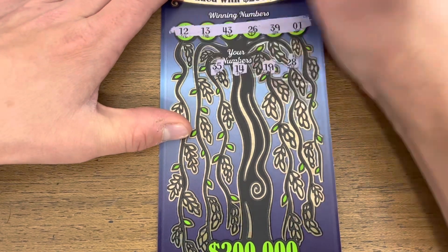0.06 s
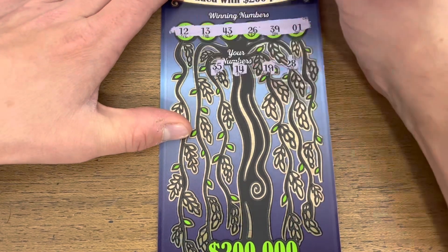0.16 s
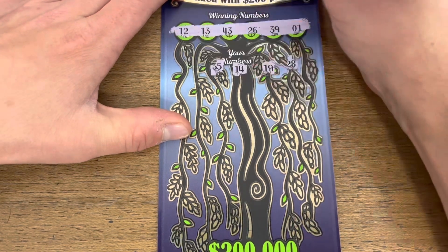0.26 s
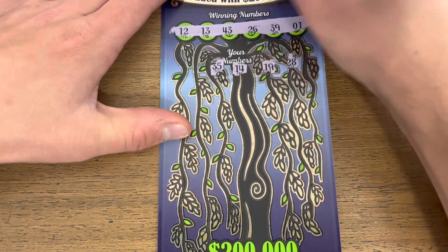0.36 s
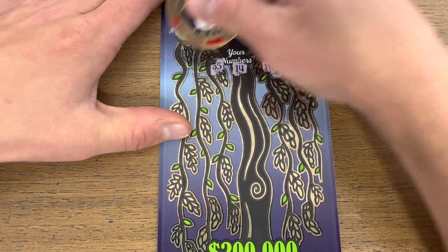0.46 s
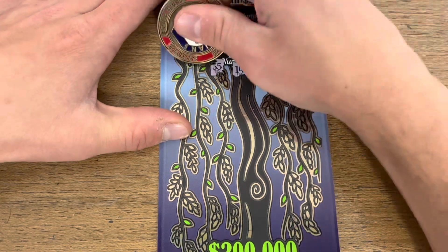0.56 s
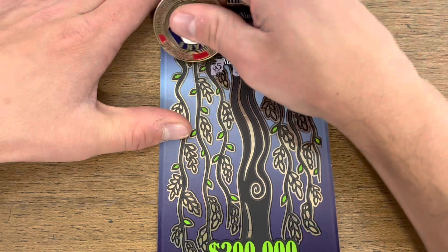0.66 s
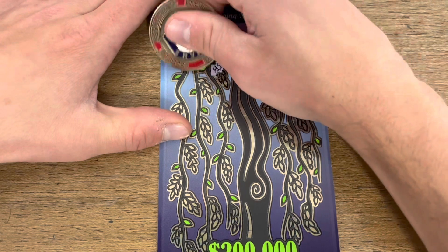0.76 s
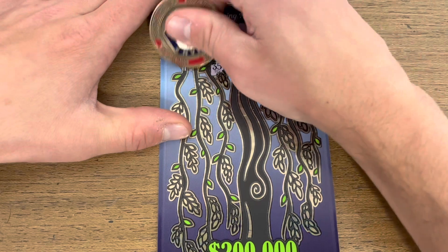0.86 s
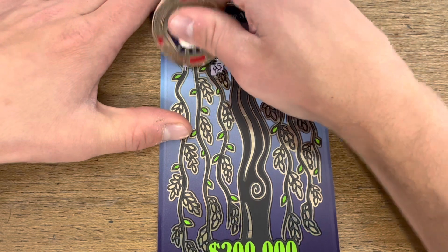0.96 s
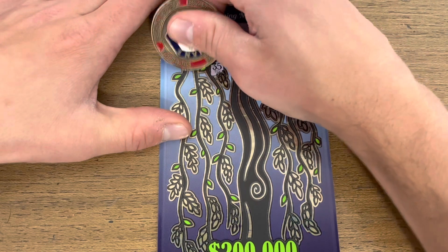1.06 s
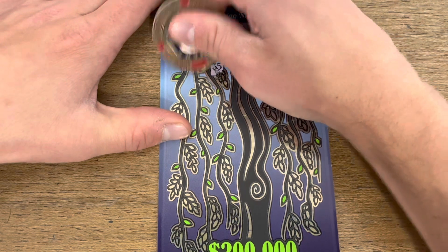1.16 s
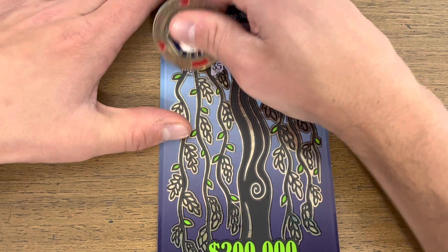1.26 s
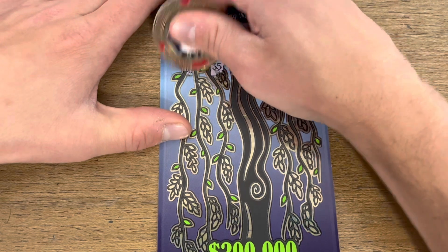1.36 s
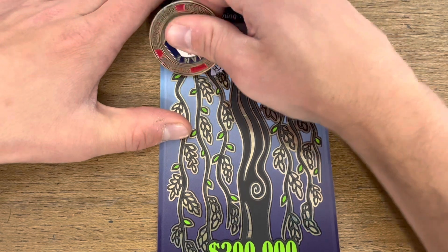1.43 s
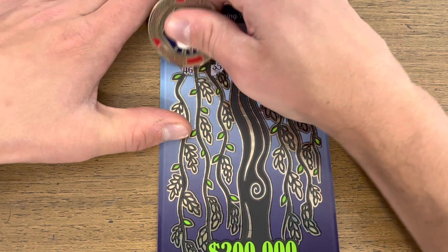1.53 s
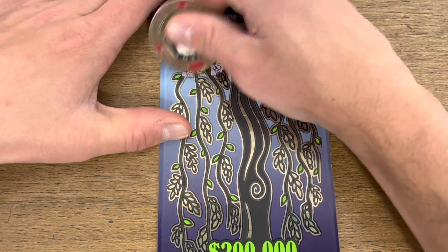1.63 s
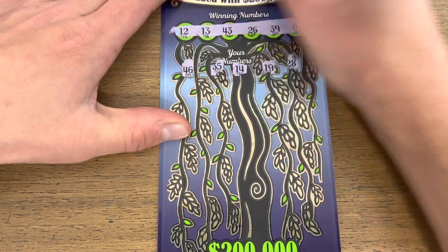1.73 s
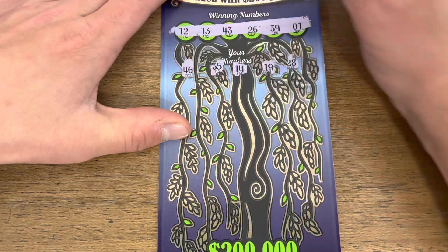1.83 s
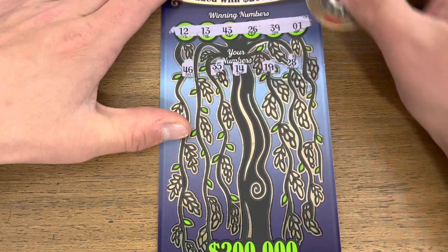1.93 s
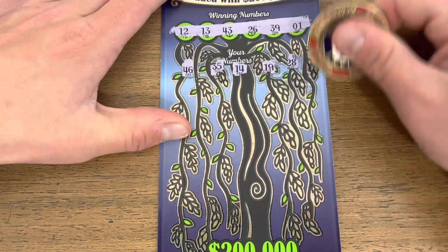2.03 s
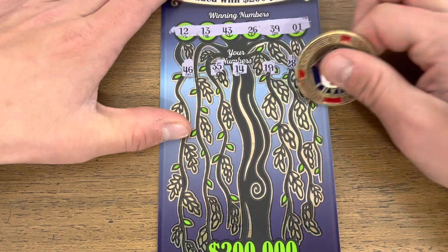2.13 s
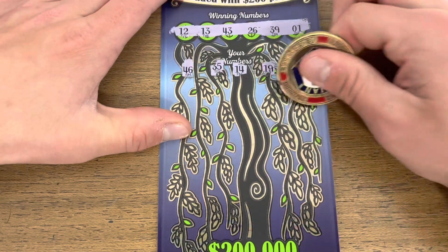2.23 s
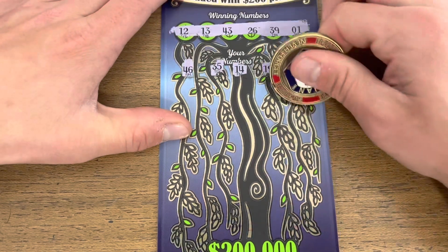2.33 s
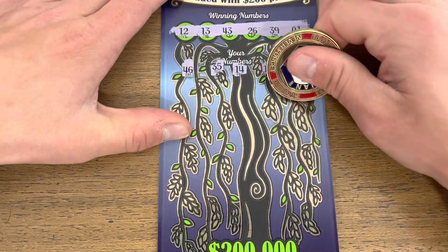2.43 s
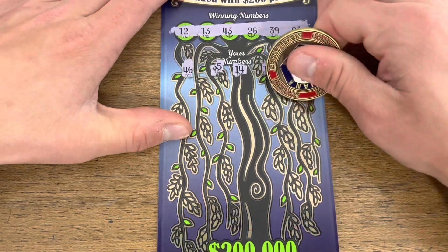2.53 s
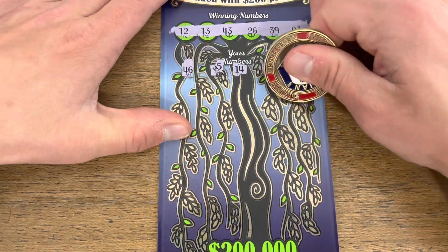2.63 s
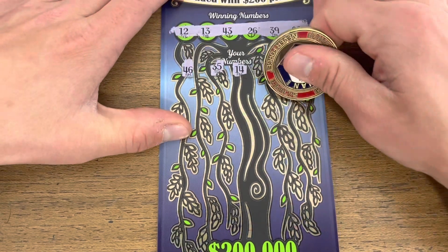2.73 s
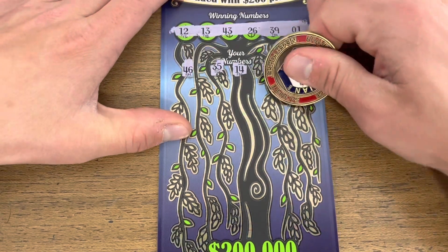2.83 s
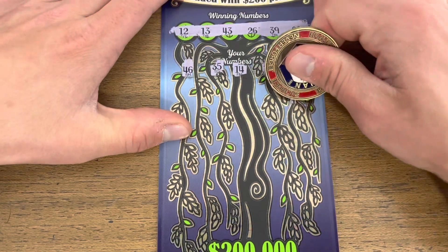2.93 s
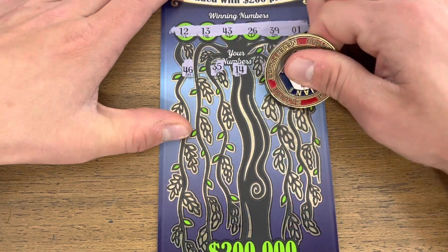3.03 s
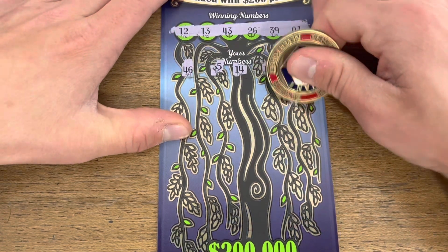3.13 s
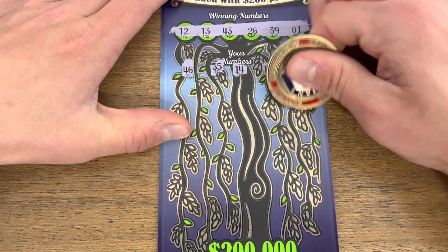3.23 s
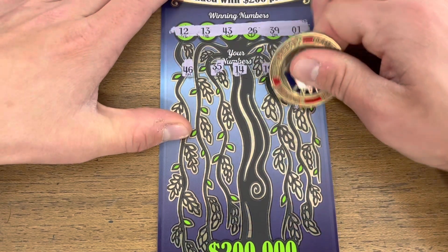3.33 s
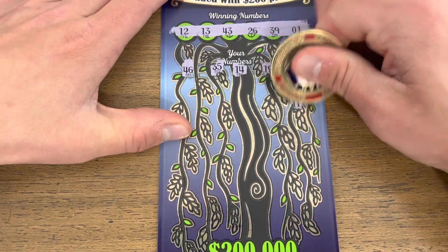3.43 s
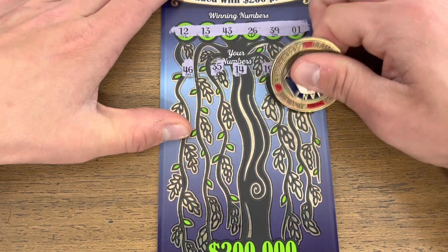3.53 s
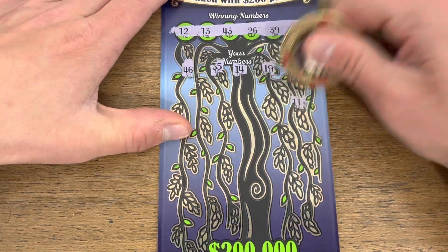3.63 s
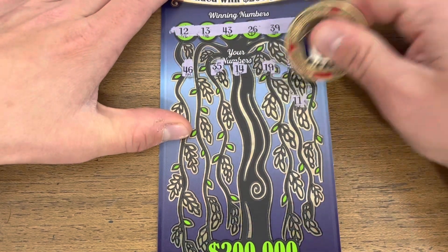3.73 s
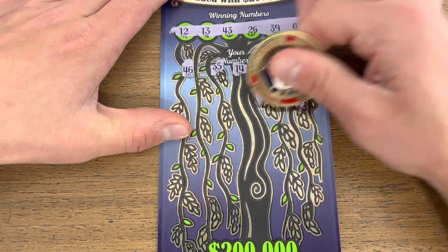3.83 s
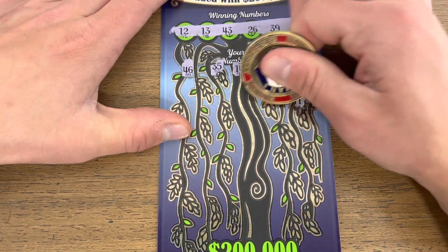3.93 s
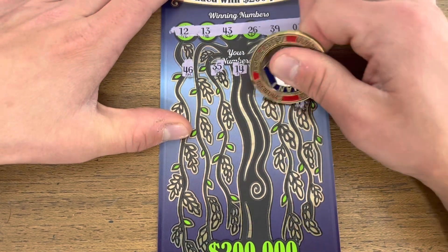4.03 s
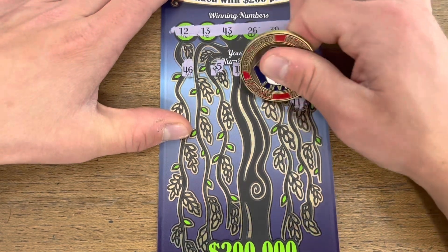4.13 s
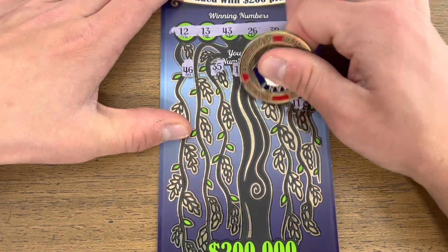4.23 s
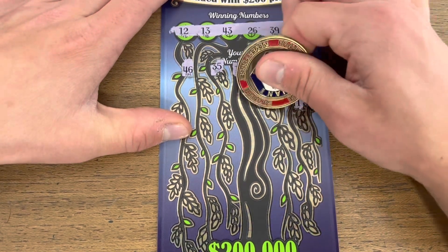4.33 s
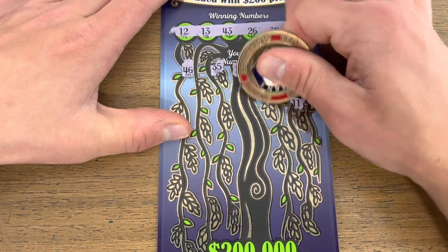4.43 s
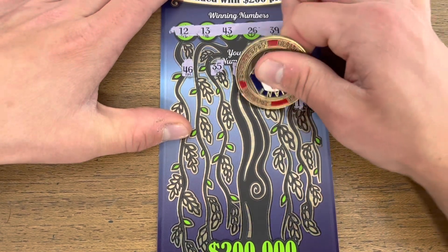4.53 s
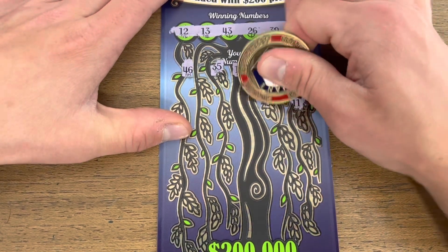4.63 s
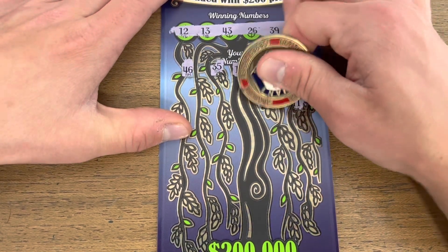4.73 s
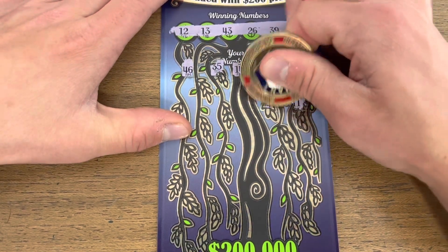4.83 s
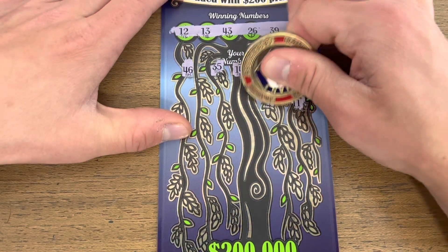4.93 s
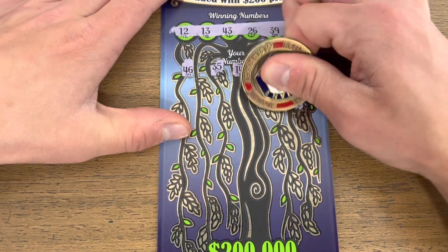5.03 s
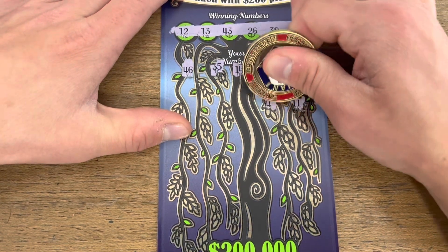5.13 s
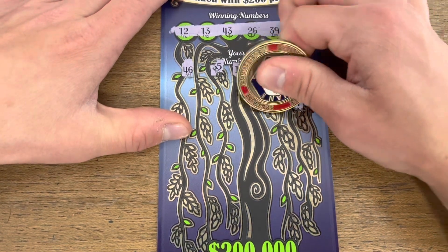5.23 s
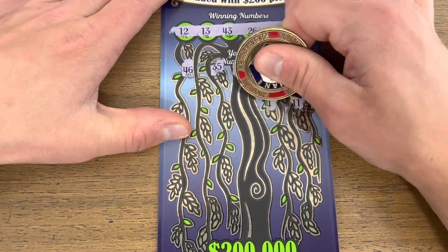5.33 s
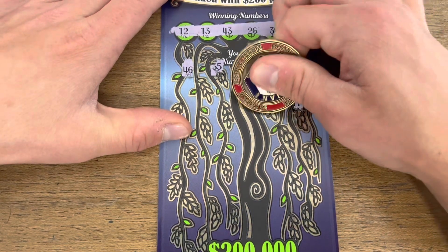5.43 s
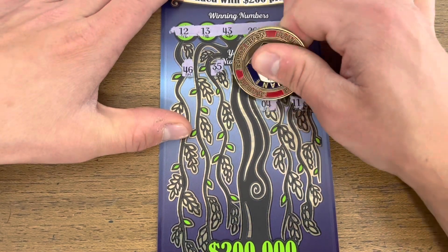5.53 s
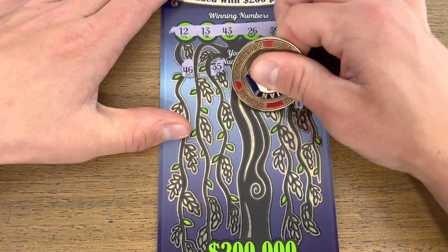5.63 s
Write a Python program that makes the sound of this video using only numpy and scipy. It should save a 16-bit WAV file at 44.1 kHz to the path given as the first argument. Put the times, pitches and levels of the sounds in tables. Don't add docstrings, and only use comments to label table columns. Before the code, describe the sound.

A coin scrapes coating off a card ticket in three bouts of quick gritty back-and-forth strokes, with knocks and finger ticks between, in a quiet room.

```python
import sys
import numpy as np
from scipy import signal
from scipy.fft import rfft, irfft
from scipy.io import wavfile
from scipy.ndimage import uniform_filter1d

SR = 44100
rng = np.random.default_rng(int(sys.argv[2]) if len(sys.argv) > 2 else 0)


def how_loud(loudness_db):
    steps = np.asarray(loudness_db, float) / 20
    return 10 ** steps


def dump(signal):
    limited = np.clip(np.atleast_2d(signal).T, -1, 1)
    pcm = np.round(limited * 32767).astype(np.int16)
    wavfile.write(sys.argv[1], SR, pcm)


N = 250047


def unit(x):
    return x / np.sqrt(np.mean(np.atleast_2d(x)[0] ** 2))


def convolve(x, h):
    return signal.oaconvolve(x, h)[:N]


def add(sound, part, start_s):
    i = int(start_s * SR)
    sound[..., i:i + part.shape[-1]] += part[..., :N - i]


def walk(rate_hz):
    hold = int(SR / rate_hz)
    steps = np.repeat(rng.standard_normal(N // 20), hold)[:N]
    return 0.99 * uniform_filter1d(steps, hold)


def flakes(rate_hz, scatter_db):
    when, size, sign = rng.random((3, N))
    height = how_loud(-scatter_db * np.log(size + 0.0012))
    return unit((when < rate_hz / SR) * height * (sign - 0.5))


def response(points):
    hz, db = np.transpose(points)
    bins_hz = np.arange(1, 4098) * SR / 8192
    cepstrum = irfft(np.log(how_loud(np.interp(np.log(bins_hz), np.log(hz), db))))
    cepstrum[1:4096] *= 2
    cepstrum[4097:] = 0
    h = irfft(np.exp(rfft(cepstrum)))
    return h / np.sqrt(np.sum(h ** 2))


def coloured(force, colour, side_db, alike):
    smear = rng.standard_normal(400) * np.exp(-np.arange(400) / 100.0)
    other = convolve(force, smear / np.sqrt(np.sum(smear ** 2)))
    alike = np.clip(alike, 0, 1)
    side = alike * force + np.sqrt(1 - alike ** 2) * other
    return np.array([convolve(force, response(colour[0])), how_loud(side_db) * convolve(side, response(colour[1]))])


def ring(modes, detune=0, shift_db=0):
    hz, t60, mid_db, side_db = np.transpose(modes)[:, :, None]
    hz = hz * (1 + detune)
    t = np.maximum(np.arange(int(t60.max() * SR)) / SR - 0.01611 / np.sqrt(hz), 0)
    decay = np.exp(-np.log(1000) * t / t60) / np.sqrt(t60)
    onset = 1 - np.exp(-t * hz * 7.6)
    waves = decay * onset * np.sin(2 * np.pi * hz * t)
    k = np.arange(len(modes))[:, None]
    mid = (-1) ** k * how_loud(mid_db)
    side = (-1) ** (k + (k % 3 == 2)) * how_loud(side_db)
    pair = (how_loud(shift_db) * np.array([mid, side]) * waves).sum(1)
    return pair / np.sqrt(np.sum(pair[0] ** 2))


def strike(force, modes, detune=0, shift_db=0):
    return signal.oaconvolve(force[None], ring(modes, detune, shift_db), axes=1)


def favour(modes, centre_hz, slope_db):
    return -slope_db * np.abs(np.log2(np.array(modes)[:, :1] / centre_hz))


def bite(length, rise_s, fall_s, drag_db):
    t = np.arange(int((length + 0.12) * SR)) / SR - 0.02
    late = np.maximum(t - length + fall_s, 0)
    press = np.exp(-np.maximum(rise_s - t, 0) ** 2 / rise_s ** 2)
    release = np.exp(-late / fall_s) + how_loud(drag_db) * np.exp(-late / 0.033)
    return press * release


# pitch_hz [Hz], level_db [dB]
AIR = [
    [(15, -16), (25, 12), (93, -2.5), (186, -15), (427, -27), (515, -32), (1090, -40), (1180, -37), (2930, -45.5), (3350, -32.5), (3830, -46), (7090, -41.5), (8550, -51), (9900, -49), (13500, -41), (14400, -56)],
    [(15, -46), (25, 28.5), (237, -6.5), (415, -5), (543, -9), (1630, -14), (2130, -19), (7890, -14.5), (15000, -43.5)],
]


def air():
    noise = rng.standard_normal(N) * how_loud(1.4 * walk(rate_hz=4.3))
    return how_loud(-54) * coloured(noise, AIR, side_db=-12, alike=0.23)


# start_s [s], length_s [s], hiss_db [dB], wood_rumble_db [dB]
SLIDES = [(-.03, 0.14, -70, -58), (0.373, .17, -76, -63.5), (0.596, 0.38, -77.5, -62),
          (0.995, 0.56, -75.5, -56), (1.615, 0.4, -61.5, -62), (2.296, .2, -100, -88),
          (2.58, 0.35, -83, -54), (2.94, 0.55, -72.5, -53.5), (3.525, 0.076, -65.5, -52),
          (3.734, 0.088, -69, -62.5), (4.254, 0.63, -78.5, -55), (4.977, 1, -73, -52.5)]


def glide(column):
    rise_s, fall_s = 0.027, 0.038
    t = np.arange(N) / SR
    gain = np.zeros(N)
    for row in SLIDES:
        start_s, length_s = row[:2]
        ease_in = np.clip((t - start_s) / rise_s, 0, 1) ** 2
        let_go = np.exp(-np.maximum(t - start_s - length_s, 0) / fall_s)
        gain += how_loud(row[column]) * ease_in * let_go
    return gain


# pitch_hz [Hz], level_db [dB]
SKIN = [
    [(470, -35), (800, -5), (1360, -3), (1460, -6), (3160, -2), (6510, -3), (8740, -32), (9890, -8), (11700, -7), (13800, -13), (15000, -49)],
    [(470, -33), (800, -3), (2300, -12), (7930, -10), (10500, -15), (12500, -58), (12900, -23), (15000, -20)],
]
# pitch_hz [Hz], t60_s [s], mid_db [dB], side_db [dB]
BASS = [(62.8, 0.61, 1, -24), (94, 0.13, -20, -42), (127.3, 0.12, 12, -24), (170, 0.11, 4, -13)]
# pitch_hz [Hz], t60_s [s], mid_db [dB], side_db [dB]
TABLE = [(213, 0.14, -8, -14), (260.2, 0.14, -6, -13), (322, 0.066, -4, -5), (376.7, 0.069, -1.5, -7),
         (405.6, 0.058, 1.5, -8.5), (468.6, 0.08, -9.5, -12), (501, 0.097, -2.5, -12),
         (615.6, 0.05, -9.5, -41), (639, 0.068, -4, -7.5)]
# pitch_hz [Hz], t60_s [s], mid_db [dB], side_db [dB]
CARD = [(744.4, 0.09, 0, -1), (809.6, 0.02, 2.5, -10), (847.3, 0.024, 5, -9.5), (942.4, 0.032, 0, -19),
        (993, 0.043, -1.5, -8), (1107, 0.018, -2, -9.5), (1106, 0.035, -4.5, -6.5), (1333, 0.027, -3, -12),
        (1462, 0.035, -3.5, 1.5), (1504, 0.0087, 1.5, -18), (1796, 0.017, -3, -4), (1836, 0.045, 0, -65)]


def sliding():
    hiss = glide(column=2) * how_loud(walk(rate_hz=30)) * flakes(rate_hz=30000, scatter_db=2.5)
    rumble = glide(column=3) * how_loud(2.9 * walk(rate_hz=57)) * flakes(rate_hz=3000, scatter_db=1.5)
    sound = how_loud(1.5) * coloured(hiss, SKIN, side_db=0, alike=0.2)
    for modes, db in ((TABLE, -6), (CARD, -12), (BASS, -6)):
        sound += how_loud(db) * strike(rumble, modes)[:, :N]
    return sound


# start_s [s], length_s [s], level_db [dB], grip_pitch_hz [Hz]
RUBS = [(0.078, 0.015, -48.5, 3200), (0.1, 0.032, -50.5, 3370), (0.14, 0.021, -47.5, 3280),
        (0.155, 0.083, -59.5, 3300), (0.263, 0.0048, -59.5, 3580), (0.27, 0.034, -84, 3270),
        (0.45, 0.06, -50.5, 3130), (0.479, 0.016, -43.5, 3220), (0.503, 0.026, -58.5, 3300),
        (2.061, 0.055, -66, 3200), (2.156, 0.026, -68.5, 3320), (2.176, 0.083, -74.5, 3720),
        (3.969, 0.022, -66.5, 2980), (4.01, 0.043, -74, 3200), (4.05, 0.047, -69.5, 3350),
        (4.091, 0.041, -72, 3160)]
# pitch_hz [Hz], t60_s [s], mid_db [dB], side_db [dB]
FINGERS = [(3200, 0.012, 6.5, -6.5), (3600, 0.0052, 3, -7), (4090, 0.006, 1.5, -10),
           (4830, 0.0013, -5, -16), (5520, 0.0022, -4, -28), (1590, 0.018, -16, -30),
           (7100, 0.0013, -6, -3), (10600, 0.0015, -13.5, -38), (12500, .003, -20, -20)]


def rubbing():
    sound = np.zeros((2, N))
    skin = how_loud(2.5 * walk(rate_hz=240)) * flakes(rate_hz=14000, scatter_db=0.5)
    for start_s, length, db, hz in RUBS:
        shape = bite(length, rise_s=min(0.002, length / 4), fall_s=min(0.004, length / 3), drag_db=-61)
        i = int((start_s - 0.02) * SR)
        force = shape * skin[i:i + len(shape)]
        add(sound, how_loud(db) * strike(force, FINGERS, detune=hz / FINGERS[0][0] - 1), i / SR)
    return sound


# start_s [s], peak_db [dB], pitch_hz [Hz], top_db [dB], ring_cycles [cycles]
TICKS = [(0.1036, -13, 3310, -28, 3.5), (0.1447, -32, 3450, -22, 2.5), (0.177, -26.5, 3500, -25, 3.7),
         (0.2557, -27, 3460, -29.5, 4.9), (0.3426, -52, 3260, -26, 3.2), (0.61, -30, 5170, -44, 5),
         (0.695, -46, 3100, -22, 4.7), (1.6064, -41, 4350, -20, 3.2), (1.6343, -29.5, 4270, -14, 4.4),
         (2.614, -43, 4330, -22, 2.3), (3.5614, -54, 4330, -18, 2.1), (3.589, -48, 4360, -8, 2.3),
         (3.6058, -17, 5580, -20.5, 1.8), (3.972, -34, 3200, -47, 2.5), (4.0994, -64, 3380, -9, 2.5)]


def ticking():
    sound = np.zeros((2, N))
    t = np.arange(500) / SR
    quick = np.exp(-t / 0.00038)
    for (start_s, db, hz, top_db, cycles), noise in zip(TICKS, rng.standard_normal((len(TICKS), 500))):
        body = np.sin(2 * np.pi * hz * t) * np.exp(-t * hz / cycles)
        body += 1.06 * np.sin(2 * np.pi * 1.47 * hz * t) * quick
        top = 0.92 * how_loud(top_db) * np.diff(noise, prepend=0) * np.exp(-t / 0.0018)
        tick = body * (1 - quick) + top
        add(sound, how_loud(db - 3.5) * tick * np.array([[1], [0.4]]), start_s)
    return sound


# pitch_hz [Hz], level_db [dB]
GRIT = [
    [(940, -33), (1600, 4.5), (2030, -4.5), (3270, -14.5), (3950, -1), (5250, -12.5), (5950, -4), (7610, -11), (9390, -10), (13600, -20), (15500, -75)],
    [(940, -10), (1600, -21), (2030, -12), (3990, -5), (5250, -20.5), (6060, -4), (8060, -16), (9660, -7), (11900, -54), (13000, 0), (15500, -73)],
]


def gritty(force, alike):
    return coloured(force, GRIT, side_db=-2.5, alike=alike)


# start_s [s], peak_db [dB], card_share_db [dB], crack_db [dB]
KNOCKS = [
    (0.384, -63, 24, -8),
    (0.405, -60.5, 18, -16),
    (0.55, -33, 14, -32),
    (0.602, -35.5, 16, -10),
    (2.261, -29.5, 9.5, -24),
    (2.408, -54, 14, -18),
    (2.525, -61, 19, -7),
    (2.863, -40.5, -2, -16),
    (4.127, -30.5, 14.5, -25.5),
    (5.023, -44, -17, -4),
]
# pitch_hz [Hz], t60_s [s], mid_db [dB], side_db [dB]
THUD = [(354, 0.052, 3.5, 1.5), (530, 0.0082, 5, -8.5), (947, 0.024, -1.5, -24)]


def knocks():
    sound, crack = np.zeros((2, N)), np.zeros(N)
    samples = np.arange(120)
    push = samples * np.exp(-samples / 5.17) / 3
    for (start_s, db, card_db, crack_db), tilt in zip(KNOCKS, rng.standard_normal((len(KNOCKS), 12, 1))):
        bodies = ((THUD, 9, 0), (TABLE, 7, 0), (BASS, 4.5, 0), (CARD, card_db - 11.5, 7))
        for modes, gain_db, slope_db in bodies:
            shift_db = favour(modes, modes[0][0], slope_db) + 1.6 * tilt[:len(modes)]
            add(sound, how_loud(db + gain_db) * strike(push, modes, shift_db=shift_db), start_s + 0.00133)
        crack[int(start_s * SR)] = how_loud(db + crack_db)
    burst = rng.standard_normal(400) * np.exp(-np.arange(400) / 80)
    return sound + how_loud(7.5) * gritty(convolve(crack, burst), alike=0.52)


# start_s [s], length_s [s], tearing_db [dB], load_db [dB], hand_weight_db [dB re load]
PUSHES = [(0.708, 0.061, -63, -45.5, -10), (0.935, 0.044, -48, -43, -8), (1.123, 0.045, -47, -38.5, -5),
          (1.333, 0.038, -47, -41.5, -1), (1.521, 0.032, -50.5, -37, -7), (2.551, 0.039, -61.5, -36, -4),
          (2.638, 0.028, -57.5, -42.5, -10), (2.739, 0.012, -61, -37, -7),
          (2.751, 0.03, -49.5, -34.5, -9.5), (2.947, 0.028, -47.5, -34.5, 2.5),
          (3.116, 0.041, -46.5, -34.5, -8.5), (3.296, 0.043, -47.5, -38.5, 0.5),
          (3.468, 0.052, -46, -37.5, -7), (4.202, 0.055, -50, -37, -13.5), (4.413, 0.041, -54.5, -39, -6),
          (4.609, 0.045, -51, -39.5, -5), (4.785, 0.015, -56, -44, 5), (4.798, 0.029, -43.5, -38, -15),
          (4.98, 0.048, -45, -37.5, -2.5), (5.173, 0.037, -55, -38, -1.5), (5.352, 0.045, -45.5, -36, -6.5),
          (5.558, 0.041, -51.5, -38, -4)]
# start_s [s], length_s [s], tearing_db [dB], card_db [dB]
PULLS = [(0.602, 0.043, -76, -56.5), (0.831, 0.053, -51, -42), (1.047, 0.04, -56, -48),
         (1.226, .024, -59, -61), (1.25, 0.016, -39, -36.5), (1.416, 0.044, -60, -52.5),
         (1.605, 0.033, -54.5, -48), (2.839, 0.037, -62.5, -56), (2.909, 0.06, -61, -57.5),
         (3.035, 0.028, -57.5, -46.5), (3.222, 0.036, -51, -43.5), (3.39, 0.035, -49.5, -42.5),
         (3.548, 0.058, -76, -59.5), (4.329, 0.036, -50.5, -41.5), (4.524, 0.015, -52.5, -45),
         (4.726, 0.026, -59, -47.5), (4.915, 0.013, -43.5, -37), (5.08, 0.016, -53, -46),
         (5.197, 0.017, -51, -43.5), (5.257, 0.051, -60.5, -50), (5.457, 0.04, -43, -36)]
# from_s [s], card_push_hz, card_pull_hz, table_push_hz, table_pull_hz [Hz]
SPOTS = [
    (0.0, 900, 1120, 400, 1200),
    (2.0, 800, 965, 375, 530),
    (3.9, 800, 960, 375, 370),
]


def strokes():
    rows = []
    for start_s, length, tear, load, weight in PUSHES:
        spot = sum(row[0] <= start_s for row in SPOTS) - 1
        card = -48 + 0.48 * (tear + 50)
        rows.append((start_s, length, tear, card, load, load + weight, *SPOTS[spot][1::2], spot))
    for start_s, length, tear, card in PULLS:
        spot = sum(row[0] <= start_s for row in SPOTS) - 1
        rows.append((start_s, length, tear, card, card - 7.5, card - 12.5, *SPOTS[spot][2::2], spot))
    return rows


# pitch_hz [Hz], t60_s [s], mid_db [dB], side_db [dB]
COIN = [(2290, 0.011, -1, -13), (2976, 0.01, -1, -15), (4090, 0.017, 1, -28), (4330, 0.015, -1.5, -11),
        (4970, 0.029, -7, -14), (5270, 0.012, -8, -8), (6120, 0.015, 2, -4.5), (6600, 0.016, -27, -14.5),
        (9850, 0.018, -12, -11), (9600, .012, -8, -15), (11250, 0.0068, -3, -24), (11840, 0.019, -7.5, -22),
        (12970, 0.0073, -7, -28), (13270, 0.014, -1, -14)]
GRIPS = [
    (0.23, 3.5, 0.12, 5, -0.61, 1, 0, 0, 3, 6, 0.81, 0.28, 12, 2),
    (1, 0, -0.65, 6.5, 1.8, 0.39, -2, 0, 3, -32, -0.83, -1, -16, 0),
    (0, -0.11, -0.14, -0.5, -0.75, -1, 2, 0, 0, -4, 1, 0, -6, 1.5),
]


def scraping():
    patchy = how_loud(2.4 * walk(rate_hz=150))
    fine = patchy * how_loud(2 * walk(rate_hz=400)) * flakes(rate_hz=5000, scatter_db=2)
    coarse = patchy * flakes(rate_hz=2200, scatter_db=2.5)
    sound, (grit, load, weight) = np.zeros((2, N)), np.zeros((3, N))
    chance = rng.standard_normal((len(PUSHES) + len(PULLS), 2, 14, 1))
    lead_s = 0.004034
    for row, (tune, tilt) in zip(strokes(), chance):
        start_s, length, grit_db, card_db, table_db, bass_db, card_hz, table_hz, spot = row
        i = int((start_s - 0.02) * SR)
        tear = bite(length, rise_s=0.0086, fall_s=0.007, drag_db=-22.5)[:N - i]
        judder = bite(length, rise_s=0.0081, fall_s=0.0058, drag_db=-23.5)[:N - i]
        tear = tear * fine[i:i + len(tear)]
        judder = judder * coarse[i:i + len(judder)]
        tear_s, wood_s = i / SR, i / SR - lead_s
        add(grit, how_loud(grit_db) * tear, tear_s)
        add(load, how_loud(table_db) * judder, wood_s)
        add(weight, how_loud(bass_db) * judder, wood_s)
        coin_shift = np.array(GRIPS[spot])[:, None] + 3.5 * tilt
        card_shift = favour(CARD, card_hz, slope_db=18) + 1.8 * tilt[:len(CARD)]
        table_shift = favour(TABLE, table_hz, slope_db=6) + 2.2 * tilt[:len(TABLE)]
        bodies = ((COIN, tear, grit_db - 2.5, 0.008, coin_shift, tear_s),
                  (CARD, judder, card_db + 2.5, 0.03, card_shift, wood_s),
                  (TABLE, judder, table_db - 1, 0.02, table_shift, wood_s))
        for modes, force, db, detune, shift_db, when_s in bodies:
            add(sound, how_loud(db) * strike(force, modes, detune * tune[:len(modes)], shift_db), when_s)
    wood = how_loud(-5) * strike(load, THUD)[:, :N] + how_loud(1.1) * strike(weight, BASS)[:, :N]
    return sound + wood + how_loud(-3) * gritty(grit, alike=0.18)


# start_s [s], peak_db [dB], wood_db [dB re peak]
SNAGS = [(0.9505, -33, -1), (1.0662, -42, 0.5), (1.0829, -45, 6), (1.1562, -35, 2.5), (1.3468, -38, -6),
         (1.5419, -36, -2), (2.7631, -45, -12), (2.9577, -34, -1), (3.0389, -43, 1.5), (3.2286, -35, -3.5),
         (3.3304, -38, -1), (3.3964, -49, 2), (3.4165, -34, -2), (4.2648, -52, 8.5), (4.4392, -35.5, -1),
         (4.4636, -60, -4), (4.7455, -39.5, 6), (4.8109, -31, -9), (4.9197, -37, -0.5), (4.9907, -33, 2.5),
         (5.2, -38, 4), (5.264, -42.5, 1), (5.289, -43, 0), (5.3064, -49, -1), (5.3687, -40, 4.5),
         (5.3968, -40, 9.5), (5.4656, -34.5, -3.5), (5.5845, -47, 4)]


def snags():
    rip, jolt = np.zeros((2, N))
    t = np.arange(400) / SR
    for (start_s, db, wood_db), noise in zip(SNAGS, rng.standard_normal((len(SNAGS), 400))):
        add(rip, how_loud(db) * noise * np.exp(-t / 0.0022), start_s)
        add(jolt, how_loud(db + wood_db) * t / 0.00035 * np.exp(-t / 0.00025), start_s)
    sound = how_loud(-9.5) * strike(rip, COIN)[:, :N] + how_loud(-8.5) * gritty(rip, alike=0.37)
    for modes, db in ((THUD, 3), (TABLE, 3), (CARD, 4), (BASS, -3)):
        sound += how_loud(db) * strike(jolt, modes)[:, :N]
    return sound


def room(pair):
    t = np.arange(SR // 2) / SR
    noise = rng.standard_normal((2, SR // 2)) * (t > 0.006)
    low, middle = uniform_filter1d(noise, size=24), uniform_filter1d(noise, size=5)
    bands = ((2.52 * low, 0.4), (3.17 * (middle - low), 0.28), (0.72 * (noise - middle), 0.15))
    tails = sum(band * np.exp(-np.log(1000) * t / t60) for band, t60 in bands)
    tails /= np.sqrt(np.sum(tails[0] ** 2))
    return how_loud(-13) * np.array([convolve(x, h) for x, h in zip(pair, tails)])


def scene():
    near = scraping() + snags() + knocks() + sliding()
    fingers = rubbing() + ticking()
    mid, side = near + fingers + room(near + 0.48 * fingers) + air()
    return np.array([mid + side, mid - side])


def roll_off(x):
    return signal.sosfilt(signal.butter(12, 15690, fs=SR, output="sos"), x)


# from_hz, to_hz [Hz]
HOLE_HZ = [7550., 9350.]


def record(dry):
    mid = dry.mean(0)
    holed = signal.sosfilt(signal.butter(3, HOLE_HZ, "bandstop", fs=SR, output="sos"), mid)
    hollowed = dry - (1 - how_loud(-32)) * (mid - holed)
    phone = signal.sosfilt(signal.butter(4, 46, "highpass", fs=SR, output="sos"), hollowed)
    low = signal.sosfilt(signal.butter(12, 13750, fs=SR, output="sos"), phone)
    mix = how_loud(-17.5) * phone + (1 - how_loud(-13)) * low
    return roll_off(mix)


dry = scene()
out = record(dry)
dump(out)
```